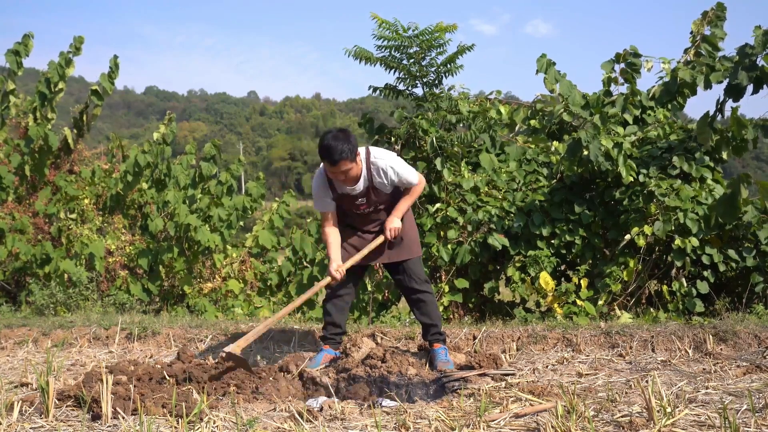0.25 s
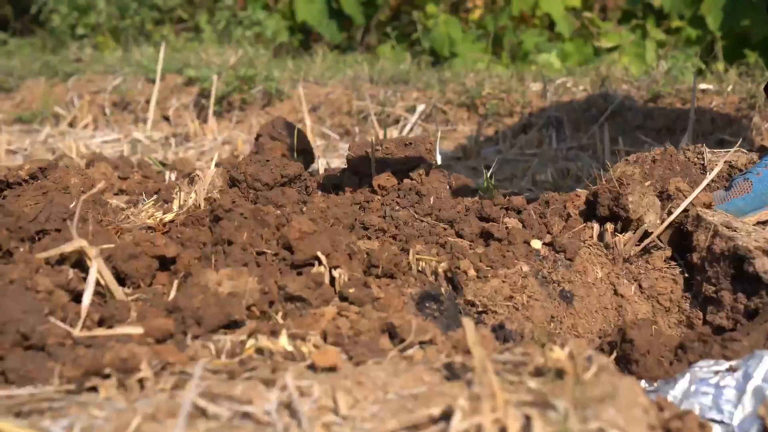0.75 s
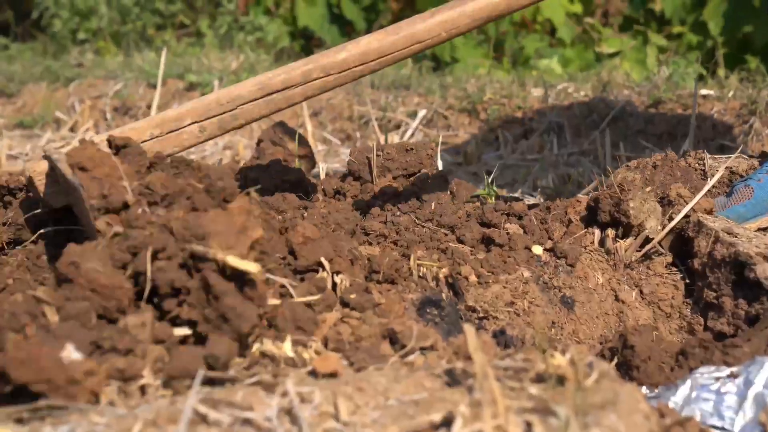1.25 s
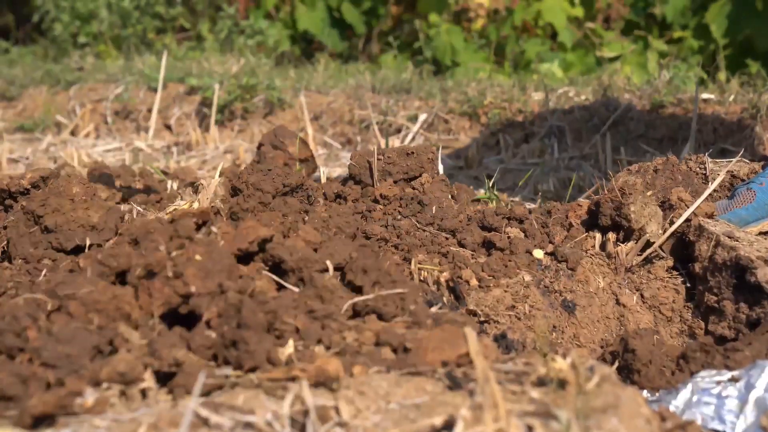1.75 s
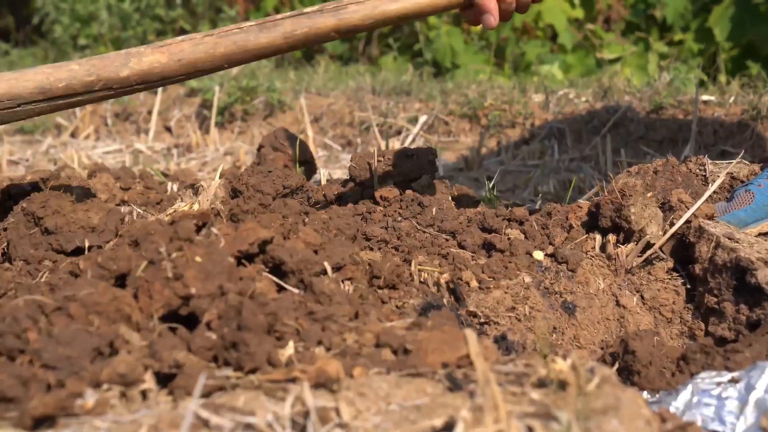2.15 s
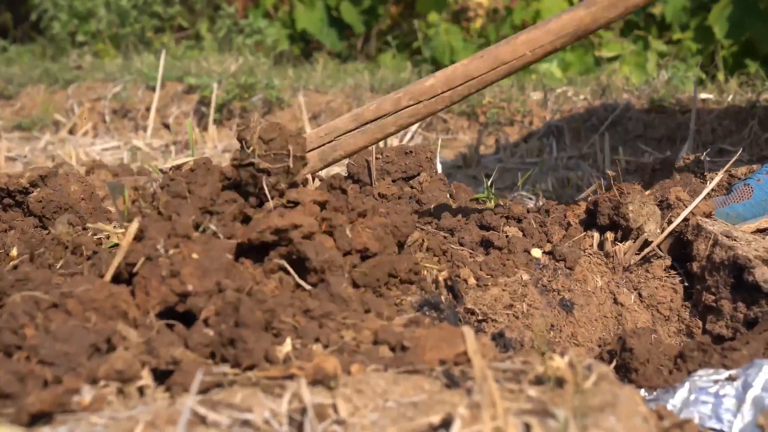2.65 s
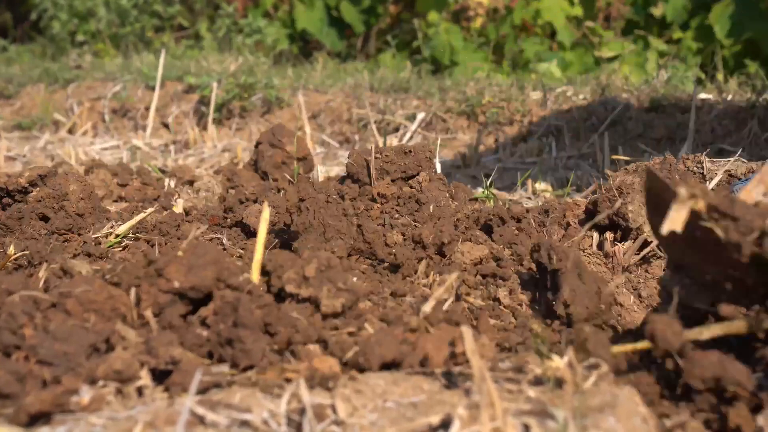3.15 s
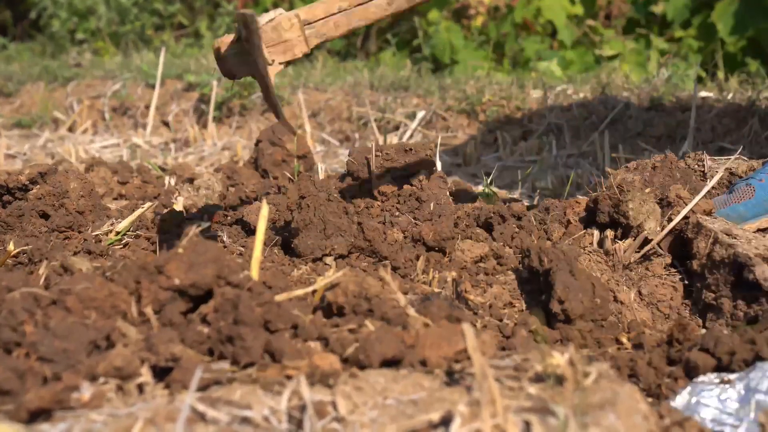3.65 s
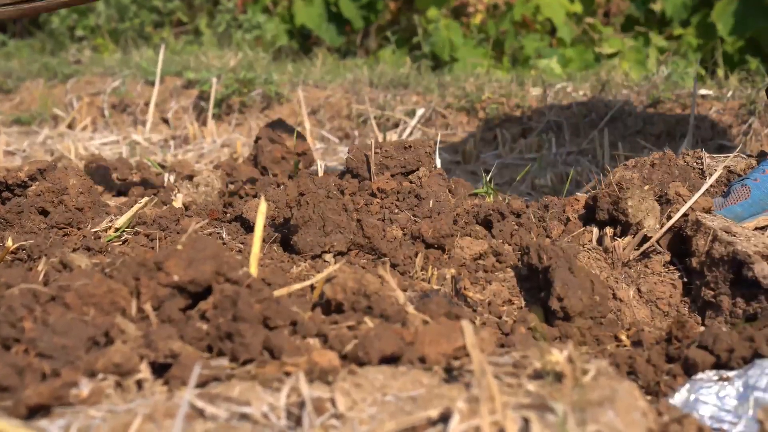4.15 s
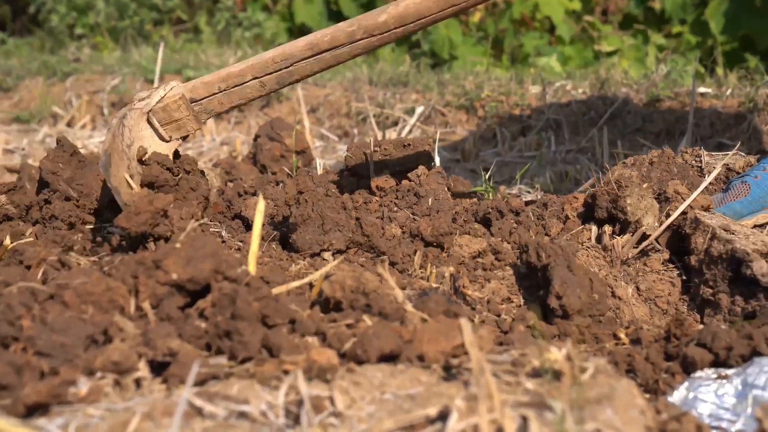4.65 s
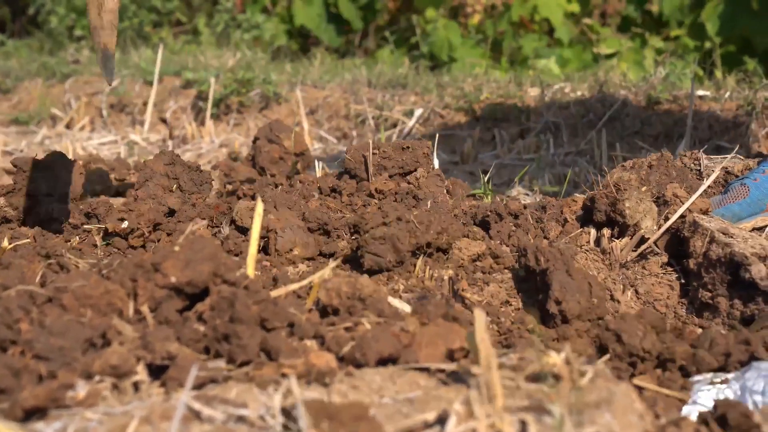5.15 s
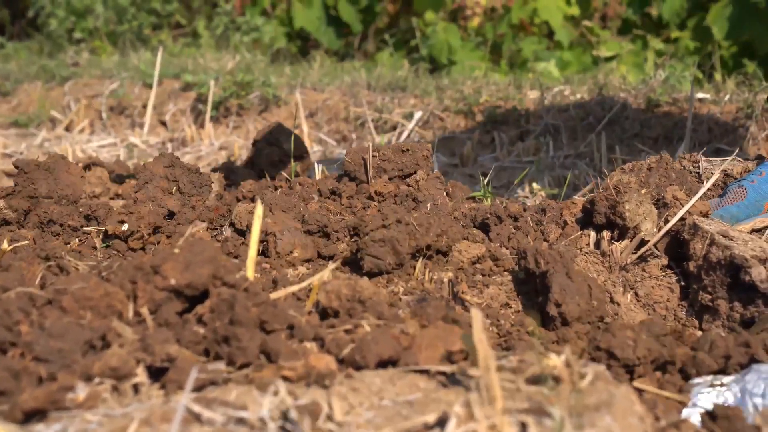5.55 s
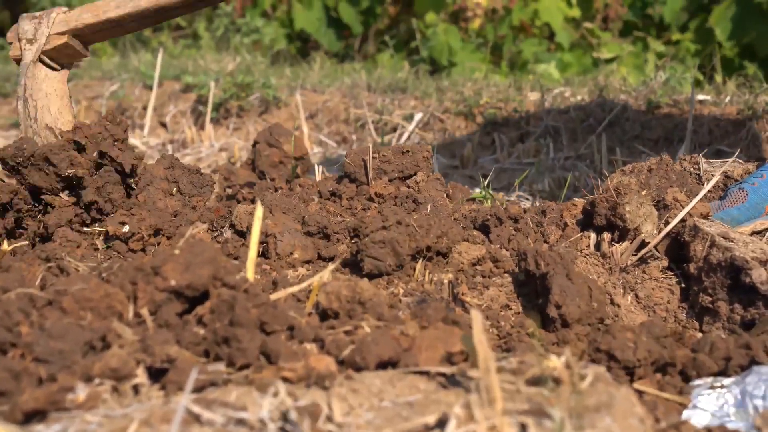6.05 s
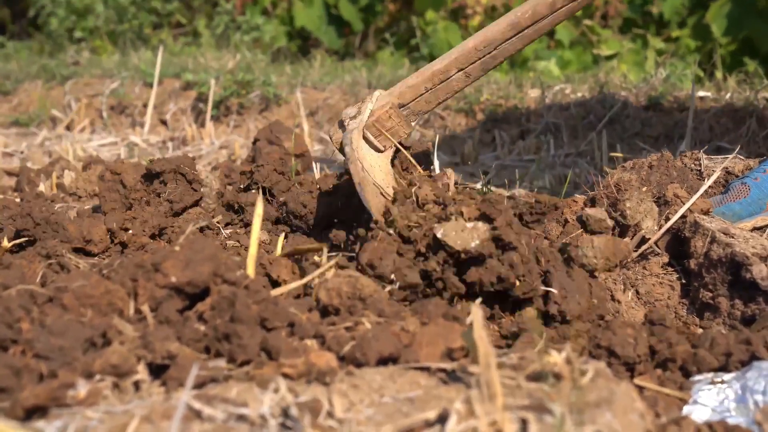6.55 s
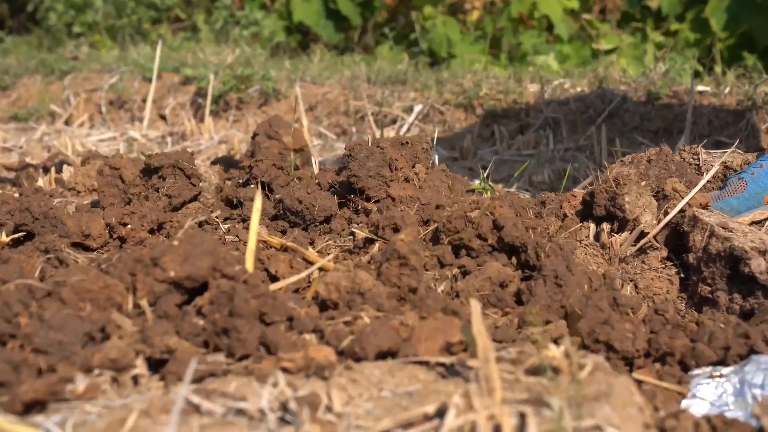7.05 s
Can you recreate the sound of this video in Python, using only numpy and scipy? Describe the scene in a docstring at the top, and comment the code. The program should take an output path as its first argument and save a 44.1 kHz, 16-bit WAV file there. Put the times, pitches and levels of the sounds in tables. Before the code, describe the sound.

Close by, a hoe bites into dry earth, lumps tumble and sand trickles, gritty metallic scraping follows, over a soft field rustle and thin birdsong.

```python
"""A steel hoe chops into dry clods in a field: knocks, scrapes with a short ring, and soil sliding along.
Blade contacts are short noise bursts and dense tiny breaks, which also drive a bank of steel resonators.
Slides are random breaks in three bands, lumps, crumbs and sand, that swell, run and settle.
Lumps thud as sinking tones and stalks snap as noise bursts; birds call in the hedge as echoed gliding tones,
and a light wind rumbles on the microphone as low noise over a steady rustle."""
import sys
import numpy as np
from scipy import signal
from scipy.io import wavfile
from scipy.ndimage import uniform_filter1d

SR = 44100
rng = np.random.default_rng(int(sys.argv[2]) if len(sys.argv) > 2 else 0)


def output_pcm(signal):
    """Save a mono or channel-first signal as 16-bit PCM at the path in sys.argv[1].

    Samples are clipped to [-1, 1] before scaling.
    """
    pcm = np.clip(np.atleast_2d(signal).T, -1, 1) * 32767
    wavfile.write(sys.argv[1], SR, np.round(pcm).astype(np.int16))


N = 321930
TIME = np.arange(N) / SR


def from_db(db):
    """Decibels to amplitude gain."""
    return 10 ** (np.asarray(db) / 20)


def band(x, low_hz, high_hz):
    """Causal band-pass."""
    edges_hz = [low_hz, min(high_hz, 0.45 * SR)]
    sos = signal.butter(2, edges_hz, "band", fs=SR, output="sos")
    return signal.sosfilt(sos, x + 1e-18)  # offset avoids denormals


def add(out, start_s, sound):
    """Mix a short sound in at start_s."""
    start = max(0, round(start_s * SR))
    out[start:start + len(sound)] += sound[:max(0, N - start)]


def drift(turns_per_s):
    """Random broken line with a new Gaussian knot at each turn; standard deviation about 1."""
    knots = rng.standard_normal(N // 20)
    line = np.interp(TIME * turns_per_s, np.arange(len(knots)), knots)
    return line * np.sqrt(3 / 2)  # interpolation lowers the variance to 2/3


def coloured(force, spectrum, low_hz, high_hz, tilt_db_per_octave=0):
    """Force times white noise, split into third-octave bands and weighted; untilted power is kept."""
    edges_hz = np.geomspace(low_hz, high_hz, round(3 * np.log2(high_hz / low_hz)) + 1)
    centres_hz = np.sqrt(edges_hz[1:] * edges_hz[:-1])
    table_hz, table_db = np.transpose(spectrum)
    gains = from_db(np.interp(np.log(centres_hz), np.log(table_hz), table_db))
    noises = force * rng.standard_normal((2, N))
    out = np.zeros(N)
    for k, gain in enumerate(gains):
        octaves = np.log2(centres_hz[k] / centres_hz[1])
        # neighbouring bands take independent noises
        ringing = band(noises[k % 2], edges_hz[k], edges_hz[k + 1])
        out += gain * from_db(tilt_db_per_octave * octaves) * ringing
    return out / np.sqrt(np.sum(gains ** 2 * np.diff(edges_hz)) * 2 / SR)


def crack(shape, hz, spread):
    """A brittle break: enveloped noise from hz / spread to hz * spread, with the energy of its envelope."""
    sound = shape * band(rng.standard_normal(len(shape)), hz / spread, hz * spread)
    return sound * np.linalg.norm(shape) / np.linalg.norm(sound)


def breaking(t, peak_s, swell_s, fall_s, rubble_db, rubble_s):
    """Force swells to the break and collapses; a weaker tail of rubble follows."""
    after = np.maximum(t - peak_s, 0)
    swell = np.exp(np.minimum(t - peak_s, 0) / swell_s)
    collapse = np.exp(-after / fall_s)
    rubble = from_db(rubble_db) * np.exp(-after / rubble_s)
    return swell * np.maximum(collapse, rubble)


def fractures(per_s, size_db, clump_db, clumps_per_s):
    """Tiny breaks at random moments, many small and few large, in clumps; levelled over 79 ms."""
    sizes = from_db(size_db * np.minimum(rng.exponential(1, N), 4))
    breaks = (rng.random(N) < per_s / SR) * sizes
    force = breaks * from_db(clump_db * drift(clumps_per_s))
    return force / np.sqrt(uniform_filter1d(force ** 2, size=3500) + 1e-6)


def flow(full_s, swell_s, run_s, settle_db_per_s, swell_db=18):
    """Gain of one movement: climbs swell_db in swell_s, runs evenly from full_s, then settles."""
    early_s = np.maximum(full_s - TIME, 0)
    late_s = np.maximum(TIME - full_s - run_s, 0)
    return from_db(-np.minimum(swell_db * early_s / swell_s + settle_db_per_s * late_s, 120))


def grain_gains(moves, sand_follows=1.11):
    """Gains of lumps, crumbs and sand; overlapping movements add in power, and sand comes to rest first."""
    power = np.zeros((3, N))
    for full_s, swell_s, run_s, crumbs_db, settle_db_per_s, lumps_db, sand_db in moves:
        gain = flow(full_s, swell_s, run_s, settle_db_per_s)
        lumps = from_db(crumbs_db + lumps_db) * gain
        crumbs = from_db(crumbs_db) * gain
        sand = from_db(crumbs_db + sand_db) * gain ** sand_follows  # dB per dB of flow
        power += np.square([lumps, crumbs, sand])
    return np.sqrt(power)


def granular(forces, spectrum, sand_tilt_db_per_octave):
    """Lumps, crumbs and sand each sound in their own range; the sand's treble is tilted."""
    # ranges of lumps, crumbs, sand: low f/Hz, high f/Hz
    zone_edges = [(70, 700), (700, 5000), (5000, 17000)]
    tilts = (0, 0, sand_tilt_db_per_octave)
    return sum(coloured(force, spectrum, *edges, tilt)
               for force, edges, tilt in zip(forces, zone_edges, tilts))


def stray_ticks(gain, level_db, size_db, low_hz, high_hz, spread, fall_s, count):
    """Single grains crack at random moments and pitches, scaled by the movement that carries them."""
    t, out = np.arange(SR // 50) / SR, np.zeros(N)
    for when, size, pitch in rng.random((count, 3)):
        hz = low_hz * (high_hz / low_hz) ** pitch
        tick = crack(np.exp(-t / fall_s), hz, spread)
        tick_gain = gain[int(when * N)] * from_db(level_db + size_db * size ** 2)
        add(out, when * N / SR, tick_gain * tick)
    return out


def open_air(wind_db=-29.0, field_db=-41):
    """Steady rustle of the field and low wind noise on the microphone, with a few stronger gusts."""
    # gusts, Gaussian in time: centre t/s, 1/e half length/s, level/dB
    gusts = [(0.0, 0.063, -11.5), (0.365, 0.24, -25), (0.685, 0.1, -16), (6.32, 0.078, -29)]
    # wind spectrum: f/Hz, relative power density/dB
    wind_colour = [(10, 6), (19, -1.5), (27, -10), (42, -14), (60, -13.5), (80, -25), (110, -29)]
    # rustle spectrum: f/Hz, relative power density/dB
    field_colour = [(35, -32), (60, 0.5), (346, -12.5), (437, -47), (579, -17), (1220, -18), (1310, -24),
                    (2000, -21), (2190, -73), (2470, -22), (7230, -35), (14900, -40), (16000, -45)]
    wind = from_db(wind_db)
    for centre_s, half_s, db in gusts:
        wind = wind + from_db(db) * np.exp(-((TIME - centre_s) / half_s) ** 2)
    buffeting = wind * coloured(np.ones(N), wind_colour, 10, 111.2)
    return buffeting + coloured(from_db(field_db), field_colour, 62.0, 17850)


def birds(chirp_every_s=0.062, echo_t60_s=0.15):
    """Thin gliding tones, smeared by decaying-noise echoes from the hedge."""
    # runs of rising chirps: start t/s, length/s, level/dB
    chirp_runs = [(.492, .28, -45), (1.624, .28, -41), (3.99, .03, -44.5), (5.326, .16, -44),
                  (7.17, .1, -45)]
    # slurred whistles: start t/s, length/s, start f/Hz, middle f/Hz, end f/Hz, level/dB
    whistles = [(0.409, 0.045, 3250, 2960, 3000, -42.5), (0.443, 0.062, 3090, 2820, 2650, -48),
                (0.596, 0.082, 4100, 3350, 3330, -42), (4.615, .155, 3780, 3660, 3320, -29),
                (7.054, 0.046, 3090, 3030, 2770, -38), (7.094, 0.11, 2470, 2340, 2900, -39)]
    calls = list(whistles)
    for run_s, run_length_s, db in chirp_runs:
        for start_s in np.arange(run_s, run_s + run_length_s, chirp_every_s):
            calls.append((start_s, 0.026, 4550, 4950, 5200, db))
    out = np.zeros(N)
    for start_s, length_s, start_hz, middle_hz, end_hz, db in calls:
        u = np.linspace(0, 1, round(length_s * SR))
        glide = np.polyfit([0, 0.5, 1], [start_hz, middle_hz, end_hz], 2)
        phase = 2 * np.pi * np.cumsum(np.polyval(glide, u)) / SR
        shape = np.sqrt(np.abs(np.sin(np.pi * u)))
        add(out, start_s, from_db(db) * shape * np.sin(phase))
    t = np.arange(SR // 2) / SR
    leaves = rng.standard_normal(len(t)) * from_db(-60 * t / echo_t60_s)
    return out + signal.fftconvolve(out, leaves / np.linalg.norm(leaves))[:N]


def ground_shake(start_s=2.232, hz=36, t60_s=0.27, db=-10):
    """A heavy blow shakes the ground under the microphone: one decaying low sine."""
    t = np.maximum(TIME - start_s, 0)
    return from_db(db - 60 * t / t60_s) * np.sin(2 * np.pi * hz * t)


def snapping(level_db=-6.5):
    """Brittle stalks and crumbs crack, each as a noise burst around its own pitch."""
    # snaps: t/s, relative level/dB, centre f/Hz
    snaps = [(0.9838, -2.5, 4470), (1.013, 0, 7900), (1.0786, -5.5, 5500), (1.097, -5, 9000),
             (1.148, -10, 8000), (1.1748, -8.5, 2970), (1.2293, -6.5, 2860), (1.412, -23, 3200),
             (1.494, -17, 2490), (1.648, -12.5, 7090), (1.7466, -13, 3200), (1.8684, -15.5, 2330),
             (2.3161, -11, 2550), (2.523, -18, 4500), (2.6317, -17, 3250), (2.742, -8, 13000),
             (2.974, -8, 3800), (2.9894, -4, 2900), (2.999, -7.5, 2900), (3.795, -12.5, 4960),
             (4.093, -21, 3420), (5.1759, -7, 2830), (5.371, -17, 7050), (6.1, -24, 3000),
             (6.17, -22, 5760), (6.221, -19.5, 4500)]
    t, out = np.arange(SR // 25) / SR, np.zeros(N)
    shape = breaking(t, peak_s=0.003, swell_s=0.00081, fall_s=0.00059, rubble_db=-12.0, rubble_s=0.0046)
    for start_s, db, hz in snaps:
        add(out, start_s, from_db(db + level_db) * crack(shape, hz, spread=2.54))
    return out


def falling_lumps(swell_cycles=0.98, sag=0.65, sag_s=0.0017, crumble=0.38, level_db=3.0):
    """Lumps bed into loose earth, and once the ground itself shakes low: a few rough cycles that swell, sink in
    pitch and stop."""
    # thuds on soft ground, lumps and at 2.237 s the shaken ground: t/s, relative level/dB, settled f/Hz
    thuds = [(0.584, -27, 219), (0.669, -19.5, 222), (0.998, -26.5, 245), (1.112, -18.5, 268),
             (1.236, -21, 266), (1.387, -20, 274), (1.449, -24, 274), (1.746, -17.5, 248),
             (2.237, -17.5, 70), (2.338, -23.5, 203), (4.275, -23.5, 185), (4.75, -18, 220),
             (4.794, -18, 136), (4.932, -11.5, 287), (4.98, -14, 202), (5.044, -11, 228), (5.101, -18, 290),
             (5.241, -15, 252), (5.422, -21.5, 257), (5.632, -18, 182)]
    t, out = np.arange(SR // 12) / SR, np.zeros(N)
    for start_s, db, hz in thuds:
        phase = 2 * np.pi * np.cumsum(hz * (1 + sag * np.exp(-t / sag_s))) / SR
        age = t * hz / swell_cycles
        shape = (age * np.exp(1 - age)) ** 2
        thud = shape * np.sin(phase)
        rough = crumble * crack(np.sqrt(shape), hz, spread=1.5)
        add(out, start_s, from_db(db + level_db) * (thud + rough))
    return out


def sliding_earth(lumps_db=0.5, crumbs_db=2.27, flutter_db=1.5):
    """Lumps tumble, crumbs crunch and sand trickles; the more earth moves, the denser the breaks."""
    # slides: full flow t/s, swell/s, run/s, crumbs relative level/dB, settling/(dB/s),
    # lumps over crumbs/dB, sand over crumbs/dB
    slides = [(0.0, .01, 0.033, -32, 34, 1, -0.5), (0.59, 0.013, 0.11, -47.5, 94, 7.5, -4.5),
              (0.895, 0.0044, 0.035, -25, 255, -0.5, 0), (0.986, 0.017, 0.025, -28.5, 136, -28, 4.5),
              (1.04, 0.18, .3, -33, 27, -4, 1.8), (1.37, 0.089, 0.0086, -43, 250, -8, 11.5),
              (2.24, .005, 0.14, -35.5, 46, -4, -0.5), (2.63, 0.068, .36, -36, 28, -5, 0.5),
              (3.17, 0.22, 0.073, -20, 39, 4, -1), (3.39, 0.26, 0.062, -17, 108, -6, -4),
              (3.66, 0.074, 0.0177, -26.5, 193.5, -1, -2.5), (3.79, 0.027, 0.027, -37.5, 41, -4.5, -2.5),
              (4.2, 0.0053, 0.0066, -43, 211, 0, 2.5), (4.93, 0.018, 0.055, -25, 100, -2, 2),
              (5.17, 0.027, 0.018, -32.5, 79, -1, 1.5), (6.06, .02, 0.19, -42.5, 23, -3.5, -1),
              (6.76, .2, 0.026, -40.5, 34, -4, -3), (6.98, 0.085, 0.083, -46.5, 118, -5, 0)]
    # earth spectrum: f/Hz, relative power density/dB
    earth_colour = [(36, -35), (62, -11), (161, 1), (287, -1.5), (526, -8), (695, -10), (856, -13),
                    (1130, -10), (1300, -11), (3070, -6), (5250, -19), (8540, -16.5), (14600, -24.5),
                    (16000, -20)]
    lumps, crumbs, sand = grain_gains(slides)
    gains = [lumps * from_db(lumps_db), crumbs * from_db(crumbs_db), sand]
    breaks = fractures(5000 + 90000 * crumbs, size_db=2.0, clump_db=1.23, clumps_per_s=310)
    forces = [breaks * gain * from_db(flutter_db * drift(110)) for gain in gains]
    # sandier soil is brighter
    sand_tilt_db_per_octave = -1.5 + 0.5 * 20 * np.log10(sand / crumbs)
    ticks = stray_ticks(crumbs, level_db=-3.0, size_db=8.5, low_hz=1800, high_hz=6500,
                        spread=2.4, fall_s=0.00065, count=260)
    return granular(forces, earth_colour, sand_tilt_db_per_octave) + ticks


def swish(centre_s=2.175, half_s=0.035, hz=2400, db=-38):
    """The blade cuts the air just before a heavy blow: a soft band of noise, Gaussian in time."""
    return from_db(db) * crack(np.exp(-((TIME - centre_s) / half_s) ** 2), hz, spread=1.23)


def scraping(lumps_db=2.0, crumbs_db=-8.5, sand_db=-4.0, flutter_db=0.74):
    """The edge sticks and slips over grit in uneven bursts of breaks and chatters on small stones."""
    # scrapes: t/s, length/s, crumbs relative level/dB, lumps over crumbs/dB, sand over crumbs/dB
    scrapes = [(4.245, 0.062, -27.5, -3.5, -6), (4.383, .34, -31.5, -7.5, -8),
               (4.773, 0.053, -23, -14, -1.5), (5.625, 0.024, -21, -1, -13.5),
               (5.697, 0.19, -36.5, -11, -4), (5.737, 0.055, -21.5, -10, -10), (5.906, 0.023, -30, -3, -5),
               (5.934, 0.078, -23.5, -8.5, -8), (6.255, 0.038, -22.5, -6, -7), (6.336, 0.24, -30, -4, -3.5),
               (6.578, 0.19, -32.5, -7, -6), (7.248, 0.079, -25, -3.5, -12.5)]
    # grinding spectrum: f/Hz, relative power density/dB
    steel_colour = [(70, -1), (220, 1), (330, -10.5), (600, -11), (1100, -16), (2200, -10), (3200, -12.5),
                    (4500, -18.5), (7500, -17), (11000, -22), (16000, -26.5)]
    swell_s, release_db_per_s = 0.0057, 253  # bites at once, lets go quickly
    moves = [(start_s, swell_s, length_s, db, release_db_per_s, lumps, sand)
             for start_s, length_s, db, lumps, sand in scrapes]
    levels = grain_gains(moves)
    breaks = fractures(4000, size_db=1.0, clump_db=2.5, clumps_per_s=140)
    forces = [breaks * level * from_db(db + flutter_db * drift(120))
              for level, db in zip(levels, [lumps_db, crumbs_db, sand_db])]
    chatter = stray_ticks(levels[1], level_db=-6.5, size_db=3.5, low_hz=1600, high_hz=6660,
                          spread=1.124, fall_s=0.0088, count=400)
    return granular(forces, steel_colour, sand_tilt_db_per_octave=-1) + chatter


def knocking(crush_db=-10.5, click_db=-17.0, thump_gain_db=-5.0, grit_gain_db=-12.0,
             thump_hz=200, grit_hz=8000, lead_s=0.025):
    """A loaded clod bursts in milliseconds: a crack, with more thump and grit the crumblier the clod."""
    # knocks: t/s, relative level/dB, 0 hard pebble - 1 crumbling clod, contact f/Hz
    knocks = [(0.672, -23.5, 0.13, 1020), (0.746, -16.5, 0.23, 2920), (0.889, 0, 0.61, 2420),
              (0.931, -14, 0.65, 3280), (2.217, -1.5, 0.67, 1200), (2.226, -0.5, 0.5, 7150),
              (2.456, -22, 0.98, 3030), (4.243, -14, 0.68, 3330), (4.345, -11.5, .02, 2950),
              (4.368, -12, .1, 3460), (4.434, -18.5, .05, 5240), (4.445, -15.5, 0.046, 4200),
              (4.469, -15, 0.078, 3130), (4.524, -15.5, 0.57, 2150), (4.572, -12.5, 0.19, 2320),
              (4.674, -22, 0.73, 3400), (4.76, -15, 0.59, 2170), (4.828, -6.5, 0.19, 2220),
              (4.922, -14.5, 0.57, 2850), (4.933, -9.5, 1, 3330), (4.986, -6.5, 0.95, 2700),
              (5.046, -13.5, 1, 2310), (5.631, -1.5, 0.4, 2680), (5.66, -20, .3, 2100),
              (5.747, -1.5, 0.21, 2580), (5.778, -3, 0.27, 3040), (5.947, -10.5, 0.65, 2900),
              (5.96, -10.5, 0.31, 2960), (6.007, -8.5, 0.48, 2950), (6.039, -3.5, 0.51, 1920),
              (6.271, -18, 0.28, 2100), (6.297, -10, 0.46, 2100), (6.399, -16.5, 0.48, 2050),
              (6.417, -10.5, 0.32, 2080), (6.473, -7, 0.29, 2200), (6.578, -19, 0.65, 2250),
              (7.287, -10.5, 0.38, 1170)]
    # crack's pitch ratio either side of the contact pitch: pebble, clod
    crack_spread = (1.69, 2.62)
    thump_over_crack_db, grit_over_crack_db = (-17, 4.5), (-26, 5)  # (pebble, clod)
    t, out = np.arange(SR // 8) / SR - lead_s, np.zeros(N)
    crush = breaking(t, peak_s=0.0013, swell_s=0.0011, fall_s=0.0032, rubble_db=-5.0, rubble_s=0.0051)
    thump = breaking(t, peak_s=0.0023, swell_s=0.0016, fall_s=0.0077, rubble_db=-3.5, rubble_s=0.0098)
    for contact_s, db, crumbly, hz in knocks:
        spread = np.interp(crumbly, [0, 1], crack_spread)
        thump_db = thump_gain_db + np.interp(crumbly, [0, 1], thump_over_crack_db)
        grit_db = grit_gain_db + np.interp(crumbly, [0, 1], grit_over_crack_db)
        blow = from_db(crush_db) * crack(crush, hz, spread)
        blow += from_db(click_db) * crack(crush, hz, spread=1.07)
        blow += from_db(thump_db) * crack(thump, thump_hz, spread=2.13)
        blow += from_db(grit_db) * crack(crush, grit_hz, spread=1.63)
        add(out, contact_s - lead_s, from_db(db) * blow)
    return out


def blade(contact, wander_db=5.0, wanders_per_s=28):
    """Contact plus the damped steel plate's modes, which swell and fade as the point of contact wanders."""
    # modes: f/Hz, width/Hz, level dragged flat/dB, level biting edge-on/dB
    modes = [(1168, 250, 2.5, 14.5), (1225, 40, 9, -11), (1510, 69, -5, 11), (2061, 31, 18.5, -28),
             (2114, 180, -7.5, 25.5), (2842, 124, 4, 21), (3080, 110, 2, 26.5), (3310, 40, 11, -4),
             (4120, 73, 6.5, -6), (4780, 43, 2, -19), (5380, 73, -8, 16), (5750, 85, -2, -4),
             (6900, 84, -6, 15), (8440, 90, 2, 15)]
    # how the blade is held: t/s, 0 dragged flat - 1 biting edge-on
    bite_curve = [(0, 0.98), (2.3, 1), (4.2, 0.14), (4.85, 0.14), (5.6, 0.59), (6.06, 0.38), (6.25, 0.083),
                  (7.3, 0.11)]
    # loose soil packed around the blade muffles its ring: t/s, ring level/dB
    muffle_curve = [(0, -15), (2.5, -13), (4.25, -2), (7.3, -2)]
    bite = np.interp(TIME, *np.transpose(bite_curve))
    muffled = contact * from_db(np.interp(TIME, *np.transpose(muffle_curve)))
    out = contact
    for hz, width_hz, flat_db, edge_db in modes:
        mode_db = flat_db + bite * (edge_db - flat_db) + wander_db * drift(wanders_per_s)
        # two-pole resonator, about unit gain at its peak
        r = np.exp(-np.pi * width_hz / SR)
        zeros = [(1 - r * r) / 2, 0, -(1 - r * r) / 2]
        poles = [1, -2 * r * np.cos(2 * np.pi * hz / SR), r * r]
        out = out + signal.lfilter(zeros, poles, muffled * from_db(mode_db))
    return out


def scene():
    """Surroundings, earth and hoe at one microphone."""
    surroundings = open_air() + birds()
    earth = ground_shake() + snapping() + falling_lumps() + sliding_earth()
    hoe = swish() + blade(scraping() + knocking())
    return (surroundings + earth + hoe)[None]


def record(dry, cutoff_hz=16000):
    """The loudest peaks are squashed smoothly, then a steep low-pass cuts the top."""
    limited = dry / (1 + dry ** 6) ** (1 / 6)
    low_pass = signal.ellip(12, 0.1, 95, cutoff_hz, fs=SR, output="sos")
    return signal.sosfilt(low_pass, limited)


dry = scene()
out = record(dry)
output_pcm(out)
```